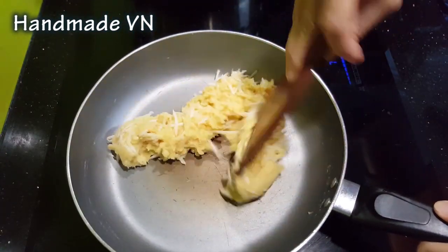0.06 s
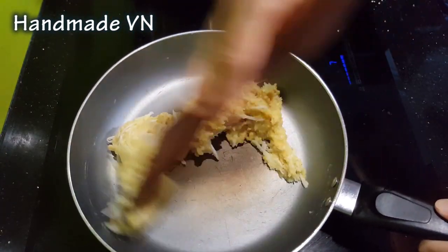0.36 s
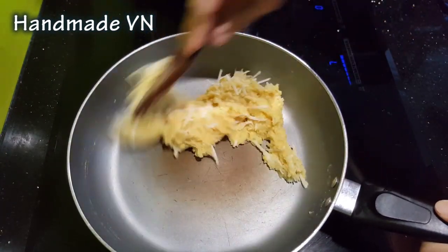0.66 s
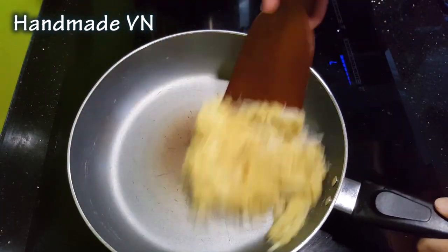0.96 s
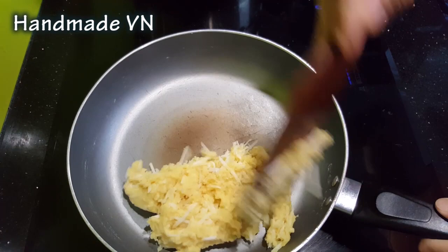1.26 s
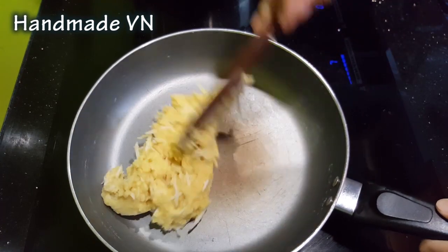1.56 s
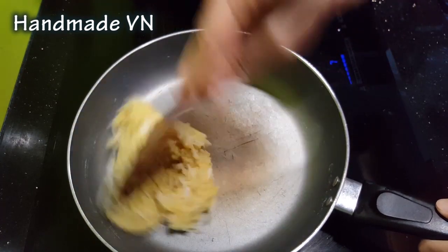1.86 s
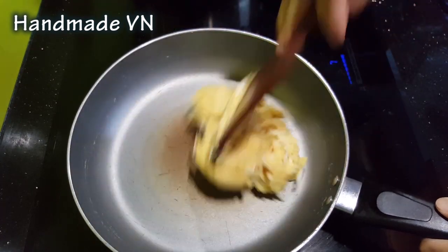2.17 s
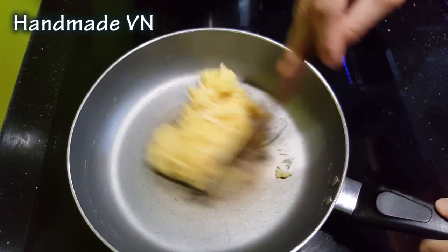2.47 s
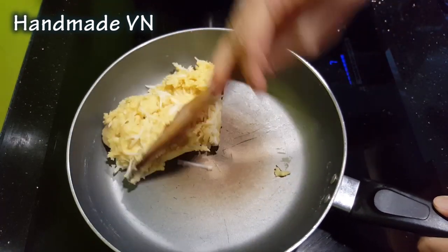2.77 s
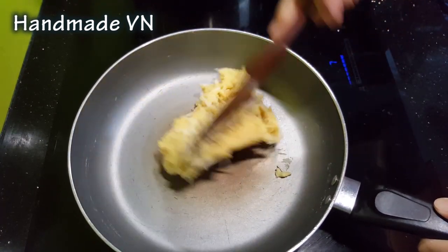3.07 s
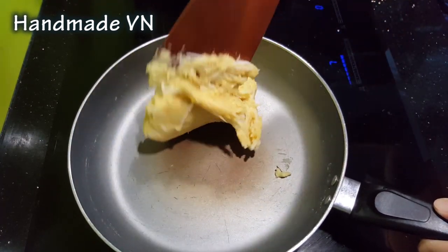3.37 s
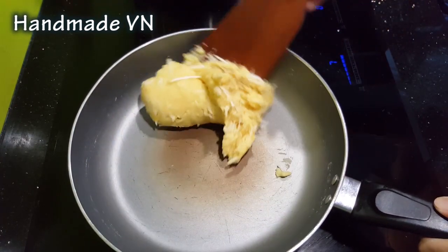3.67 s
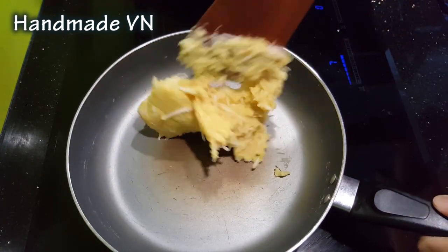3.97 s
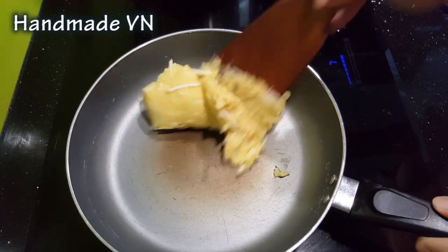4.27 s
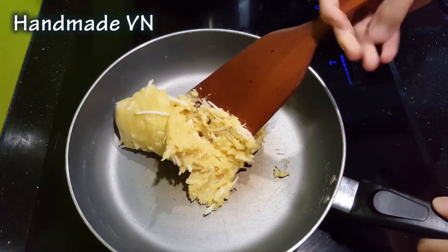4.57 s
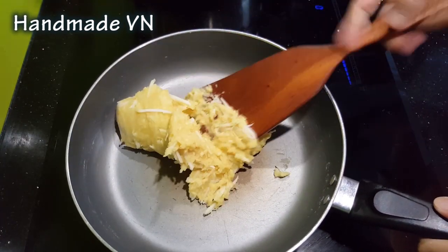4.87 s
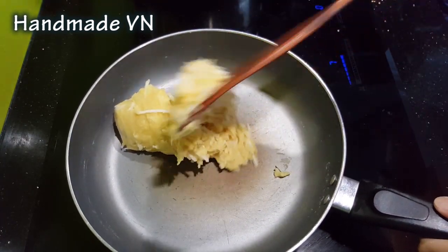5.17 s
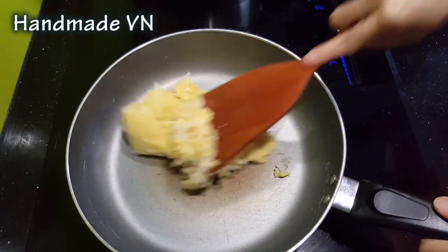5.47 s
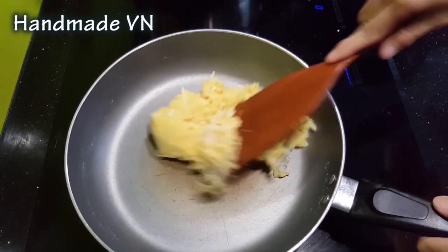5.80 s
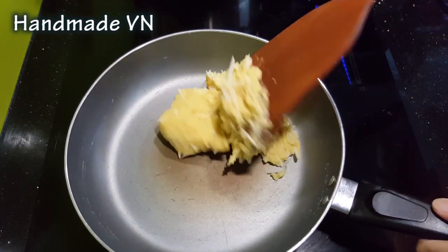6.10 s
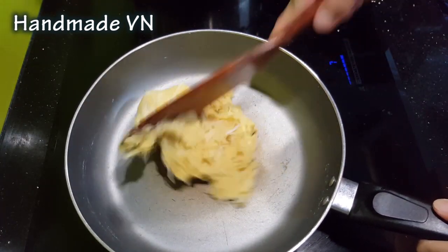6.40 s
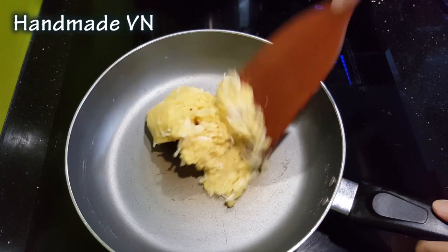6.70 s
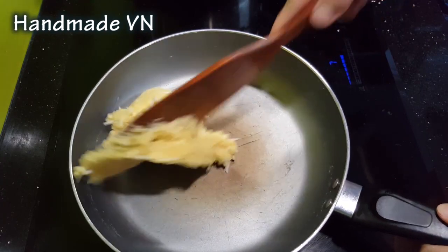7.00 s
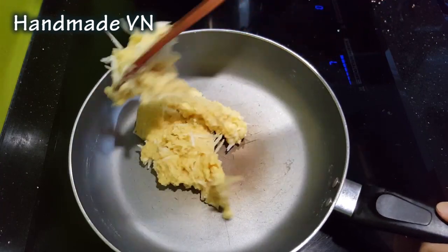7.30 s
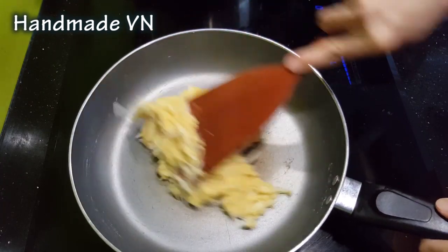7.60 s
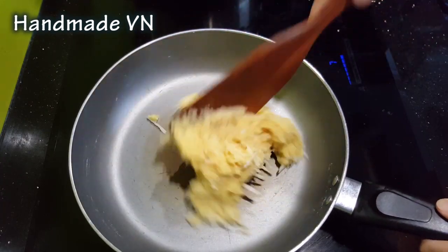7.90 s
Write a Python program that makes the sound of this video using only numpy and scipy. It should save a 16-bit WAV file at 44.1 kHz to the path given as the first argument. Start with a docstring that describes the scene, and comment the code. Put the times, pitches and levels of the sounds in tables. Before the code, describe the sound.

Over a low electric hum and soft fan, a wooden spatula scrapes thick food around a frying pan, with dull clacks and thumps.

```python
"""A wooden spatula folds a thick, sticky mixture in a nonstick pan, in a small kitchen.
From the start the induction hob hums over its cooling fan, while the blade rubs across the coating,
knocks on the metal and snaps sticky strands. Just after 3 s the pan thumps hardest on the glass top.
Softer strokes follow, the bare edge squeaking, and a little after 5 s lumps flop over.
A sharp clack at 7 s leads into the last strokes."""
import sys
import numpy as np
from scipy import signal
from scipy.fft import rfft, irfft, next_fast_len
from scipy.io import wavfile
from scipy.ndimage import uniform_filter1d

SR = 44100
rng = np.random.default_rng(int(sys.argv[2]) if len(sys.argv) > 2 else 0)


def generate_wav(sig):
    """Save sig (samples, or channels by samples) to the path in sys.argv[1] as 16-bit PCM at SR."""
    pcm = np.round(np.clip(np.atleast_2d(sig).T, -1, 1) * 32767).astype(np.int16)
    wavfile.write(sys.argv[1], SR, pcm)


N = 355005
HUM_HZ = 100.27  # twice the mains frequency
PUSH_S, EASE_S = 0.12, 0.064  # the blade gathers speed and slows down over these times


def rubbing(slips_per_s=1100, judder_db=1.3, ring_db=-8, creep_db=-69.5, uneven_db=0.8):
    """Countless tiny slips of wood and mixture on the coating; each stroke brings out its own note."""
    # Blade strokes. Each row: start and length in seconds, level in dB, note of blade and pan in Hz.
    strokes = [(0.03, 0.18, -54, 2370), (0.361, 0.13, -51.5, 1300), (0.584, 0.23, -54, 2220),
               (0.8, 0.19, -60, 2730), (1.05, 0.38, -67.5, 1400), (1.331, 0.47, -56, 3020),
               (2.133, 0.15, -58, 2400), (2.433, 0.18, -64, 1250), (2.657, 0.24, -55.5, 1200),
               (3.155, 0.17, -55.5, 2340), (3.55, 0.24, -60.5, 1104), (4.151, 0.31, -77, 2800),
               (4.441, 0.18, -58.5, 3000), (5.005, 0.17, -57, 1990), (5.307, .55, -70.5, 2750),
               (5.454, .35, -64.5, 700), (6.071, 0.29, -62.5, 2980), (6.173, 0.36, -62, 1400),
               (6.486, 0.16, -55.5, 2100), (6.697, 0.29, -69, 2600), (7.07, 0.25, -61.5, 1100),
               (7.504, 0.18, -52, 2420), (7.779, 0.15, -64.5, 2410)]
    # Tone of the rubbing. Each row: frequency in Hz, level in dB.
    rub_tone = [(150, -35), (350, -6.5), (750, 0), (1400, 7), (1900, 1.5), (2500, 2.5), (3300, 0),
                (5000, -4.5), (7000, -15), (9500, -30.5), (12500, -8.5), (14000, -37.5)]
    slips = (rng.random(N) < slips_per_s / SR) * amp(3 * np.minimum(rng.exponential(1, N), 5))
    drive = unit(unit(slips * noise(N)) + 0.9 * noise(N))  # grain plus smooth sliding
    drive = drive * amp(judder_db * drift(70)) * (1 + 0.051 * coil_wave(N))
    rub = unit(colour(pair(drive), rub_tone))
    rub += amp(ring_db) * unit(signal.oaconvolve(drive[:1], pan_ring(), axes=1)[:, :N])
    out = amp(creep_db) * touching() * rub  # between strokes the blade still creeps along
    for s, length, db, hz in strokes:
        strength = stroke_swell(length)
        start = rng.integers(N - len(strength))  # every stroke crosses other grit
        note = voiced([(hz, 0)], hz, lift_db=4, octaves=0.34)
        stroke = colour(rub[:, start:start + len(strength)], note)
        add(out, s - PUSH_S / 2, amp(db) * unit(stroke) * strength)
    return amp(uneven_db * drift(25)) * out  # the hand presses a little unevenly


def stroke_swell(length, arch_db=1):
    """Friction over one stroke: it swells, peaks halfway where the blade is fastest, and eases off."""
    t = np.arange(-PUSH_S / 2, length + EASE_S / 2, 1 / SR)
    moving = np.clip(t / PUSH_S + 0.5, 0, 1) * np.clip((length - t) / EASE_S + 0.5, 0, 1)
    arch = np.sin(np.pi * np.clip(t / length, 0, 1))
    return moving * amp(arch_db * (arch - 2.5))


def touching():
    """A soft gate: one while the blade is in the mixture, zero while it is lifted clear."""
    # Lifts of the blade. Each row: start in seconds, length in seconds.
    lifts = [(1.81, 0.19), (2.955, 0.055), (3.33, 0.05), (4.71, 0.18), (7.317, 0.058)]
    t = np.arange(N) / SR
    lifted = sum((t > s) & (t < s + length) for s, length in lifts)
    return 1 - uniform_filter1d(lifted.astype(float), size=1500)


def rasps(chatter=0.15, grit_db=1.0):
    """The bare edge chatters as it drags over the humming pan, and excites one squeaky resonance."""
    # Drags. Each row: start and length in seconds, level in dB, squeak in Hz, squeak boost in dB.
    drags = [(0.421, 0.084, -46, 1294, 11.5), (0.601, 0.1, -58, 1770, 3), (3.13, 0.16, -53, 1500, 3),
             (3.57, 0.34, -64.5, 1934, 26), (4.399, 0.59, -72, 1980, 22), (4.995, 0.24, -62, 1100, 2),
             (6.172, 0.23, -67, 1480, 11), (7.008, 0.036, -38.5, 2460, 7), (7.022, 0.071, -43.5, 1300, 9.5),
             (7.551, 0.21, -52, 1340, 5)]
    # Tone of the dragging edge. Each row: frequency in Hz, level in dB.
    rasp_tone = [(120, -16), (280, 6), (600, 0), (900, 3), (1350, -2.5), (1800, -0.5), (2500, -4.5),
                 (4000, -9.5), (6000, -19.5), (9000, -31), (13000, -31)]
    out = np.zeros((2, N))
    for s, length, db, hz, lift_db in drags:
        t = np.arange(int(length * SR)) / SR
        grit = noise(SR) * amp(grit_db * drift(520)[:SR])
        drive = grit[:, :len(t)] * (1 + chatter * coil_wave(len(t)))
        scrape = unit(colour(pair(drive), voiced(rasp_tone, hz, lift_db, octaves=0.17)))
        add(out, s, amp(db) * scrape * np.sin(np.pi * t / length))
    return out


def knocks(crack_db=5, crack_s=0.00028, rise_s=0.00024, flat_delay_s=0.0035, flat_db=-5):
    """Wood hits metal, corner first, then the flat edge: a crack, a short clatter, a damped ring."""
    # Corner hits. Each row: time in seconds, body level in dB, treble level in dB,
    # contact t60 in seconds, hollow note in Hz, pan ring against the clatter in dB.
    corners = [(0.2539, -30.5, -57, 0.015, 1470, -13), (.256, -32.5, -58, 0.021, 720, -17),
               (0.263, -60, -45, .025, 1360, -21), (.281, -58, -51, .025, 620, -18),
               (0.291, -52, -55, .03, 580, -10), (.311, -58, -69, 0.033, 587, -15),
               (.327, -61, -68, 0.028, 680, -12), (0.558, -52, -63, 0.12, 1100, -3),
               (.592, -58, -52.5, 0.044, 1490, -9), (2.01, -46.5, -50, 0.055, 860, -6),
               (2.012, -45, -49.5, 0.031, 1630, -8), (2.085, -62, -49, .025, 1910, -1),
               (2.109, -33.5, -53, 0.027, 488, -22), (2.116, -43, -66, 0.025, 1080, -8),
               (3.083, -35, -35, .028, 2120, -6), (3.12, -24, -38, 0.042, 1330, -15.5),
               (3.493, -52.5, -52.5, 0.042, 1950, -2), (5.189, -61, -53, 0.026, 1171, -8),
               (6.131, -54, -65, 0.017, 1090, -3), (6.533, -45.5, -53, 0.086, 766, -8),
               (7.0068, -29.5, -42.5, 0.044, 930, 6), (7.011, -40.5, -53, 0.038, 286, -18),
               (7.012, -34, -48, 0.034, 1100, 3), (7.045, -46, -40, 0.025, 1390, -6),
               (7.0595, -47, -43, .03, 2000, -12), (7.619, -51, -48, 0.11, 1360, -3)]
    # Tone of the clatter. Each row: frequency in Hz, level in dB.
    clack_tone = [(40, -65), (100, -21), (270, 6), (340, 8.5), (420, 3.5), (500, -1.5), (760, 1),
                  (1050, -7.5), (1400, -8.5), (1900, -9.5), (2600, -8), (4000, -17), (6000, -20),
                  (8000, -44), (13000, -28)]
    flats = [(s + flat_delay_s, db + flat_db, top_db + flat_db, *rest)
             for s, db, top_db, *rest in corners]
    out, t = np.zeros((2, N)), np.arange(SR // 5) / SR
    for s, db, top_db, t60, hz, ring_db in corners + flats:
        contact = amp(-60 * t / t60) + amp(crack_db) * np.exp(-t / crack_s)
        contact *= 1 - np.exp(-t / rise_s)
        clack = crest(colour(pair(noise(len(t))) * contact, clack_tone))
        clack += amp(ring_db) * crest(pan_ring())
        # the place and softness of the contact bring out one note and damp what lies far from it
        band = [(hz / 4, -7), (hz / 2, 0), (hz * 2, 0), (hz * 4, -8)]
        lift_db = 8 + 9 * np.clip(np.log2(800 / hz), 0, 1)  # cushioned blows sound the most hollow
        hit = crest(colour(clack, voiced(band, hz, lift_db, octaves=0.36)))
        top = treble(hit, 2140)
        add(out, s, amp(db) * (hit - top) + amp(top_db) * crest(top))
    return out


def pan_ring(spread_db=6.5):
    """The loaded pan rings briefly; the balance of its modes changes with the place that is touched."""
    # Pan modes. Each row: frequency in Hz, level in dB, t60 in seconds.
    pan_modes = [(384, -9, 0.12), (553, -7.5, 0.25), (780, 7.5, 0.063), (820, -3.5, 0.032),
                 (955, -3.5, 0.087), (1120, 0.5, 0.074), (1358, 0, .042), (1355, -0.5, 0.032),
                 (1640, -28, 0.068), (1960, -17, 0.048), (2080, -24, 0.042), (2580, -6, 0.022),
                 (3360, -9, 0.077), (3610, -21, 0.052)]
    t = np.arange(SR // 5) / SR
    hz, db, t60 = np.transpose(pan_modes)[:, :, None]
    shape = (2, len(pan_modes), 1)
    decay = amp(db + spread_db * rng.standard_normal(shape) - 60 * t / t60)
    modes = decay * np.sin(2 * np.pi * (hz * t + rng.random(shape)))
    return pair(modes.sum(1))


def thumps(rise_s=0.01, low_cut_hz=63, lag_s=0.000095):
    """The pan rocks and drops back on the glass; harder landings favour the higher modes."""
    # Landings. Each row: time in seconds, level in dB, hardness in dB per octave, ring time factor.
    landings = [(.035, -42, 12, 1), (.254, -27, 1, 0.72), (0.279, -35.5, 10.5, 1.1), (0.313, -40, 17, 0.85),
                (.41, -38, -2, 0.88), (0.554, -41.5, 2, .9), (.588, -32.5, -9, 0.62),
                (0.622, -38.5, 9.5, 0.67), (1.237, -38, -7, 1.2), (2.007, -39, -7, 1.2),
                (2.108, -21.5, -4.5, 0.65), (2.146, -37, -2, 0.5), (3.084, -33, 3.5, 0.83),
                (3.108, -11, 4.5, 0.59), (3.1244, -22.5, 22.5, 0.75), (3.152, -28, 5, 0.46),
                (3.203, -29.5, -25, .6), (3.238, -34, -15.5, 0.61), (3.225, -38.5, 7, 3.7),
                (6.535, -34.5, -5.5, 1.1), (7.006, -25, 2, 0.81), (7.586, -28, -14, 0.99),
                (7.622, -44, 7, 0.87)]
    # Low modes of pan and hob top. Each row: frequency in Hz, level in dB, t60 in seconds.
    hob_modes = [(87.7, 5, 0.13), (111.5, 13, 0.11), (136.5, 0, 0.2), (163, 8.5, 0.064), (221.8, 4, 0.16),
                 (371, -19, 0.11), (463, -3.5, 0.017)]
    out, t = np.zeros((2, N)), np.arange(SR // 2) / SR
    hz, db, t60 = np.transpose(hob_modes)[:, :, None]
    arrival = np.array([t, t - lag_s])[:, None]  # the left microphone is nearer
    attack = 1 - np.exp(-t / rise_s)
    for s, level_db, hardness, ring in landings:
        decay = amp(db + hardness * np.log2(hz / hz[0]) - 60 * t / (t60 * ring))
        modes = decay * np.sin(2 * np.pi * hz * arrival)
        add(out, s, amp(level_db) * crest(modes.sum(1) * attack))
    return signal.sosfilt(signal.butter(6, low_cut_hz, "high", fs=SR, output="sos"), out)


def snaps(trim_db=-1, decay_s=0.0079):
    """Sticky strands tear off the coating, each with a tiny pitched crackle."""
    # The loudest strands. Each row: time in seconds, level before the trim in dB, pitch in Hz.
    strands = [(0.1016, -58, 1880), (1.3707, -57, 2410), (1.492, -55, 3200), (2.298, -61, 4200),
               (2.911, -54.5, 1860), (4.2512, -57, 2040), (5.091, -56.5, 2590), (4.3037, -58, 2830),
               (4.605, -52.5, 3250), (4.676, -54.5, 3200), (4.9922, -58, 4400), (6.103, -56, 4450),
               (6.535, -44, 3900), (6.614, -60, 2070),  (7.222, -56.5, 2000)]
    # Tone of a snap. Each row: frequency in Hz, level in dB.
    snap_tone = [(400, -39.5), (1200, -13), (2400, 2.5), (3300, 2.5), (4500, -1), (7000, -17.5),
                 (9500, -12), (13000, -19)]
    out, t = np.zeros((2, N)), np.arange(SR // 8) / SR
    for s, db, hz in strands:
        burst = noise(len(t)) * np.exp(-t / decay_s)
        snap = colour(burst, voiced(snap_tone, hz, lift_db=11, octaves=0.11))
        add(out, s, amp(db + trim_db) * crest(snap))
    return out


def flops(swell_s=0.009):
    """Lumps fold over and land with a soft, hollow pop: a low note and a puff of air."""
    # Lumps. Each row: time in seconds, level in dB, pitch in Hz.
    lumps = [(5.225, -48, 367), (5.256, -52, 460), (5.327, -52.5, 345), (5.368, -54.5, 328)]
    # Tone of the puff. Each row: frequency in Hz, level in dB.
    puff_tone = [(200, -9.5), (380, 13), (520, -1), (850, -4), (1600, -31), (5000, -56)]
    out, t = np.zeros((2, N)), np.arange(SR // 8) / SR
    for s, db, hz in lumps:
        puff = unit(colour(pair(noise(len(t))), puff_tone))
        pop = (np.sin(2 * np.pi * hz * t) + puff) * t * np.exp(-t / swell_s)
        add(out, s - swell_s / 2, amp(db) * crest(pop))
    return out


def fizz(level_db=-75.5):
    """Wet strands sliding over each other give a fine, high hiss."""
    # Tone of the hiss. Each row: frequency in Hz, level in dB.
    fizz_tone = [(3000, -26), (6000, -16), (9500, -11), (12000, -0.5), (13400, 1.5), (15000, -16)]
    return amp(level_db) * touching() * unit(colour(noise(N), fizz_tone))


def hum(wobble_db=1.27, overtone_waver=0.3, whine_waver=0.18):
    """The coil shakes the pan, louder or softer as the pan shifts over it; thin whines ride above."""
    # Level ride of the fundamental. Each row: time in seconds, level in dB.
    ride = [(0.01, -48), (0.04, -50), (0.09, -36), (0.15, -35), (0.33, -38), (1.35, -44), (1.8, -33.5),
            (2.0, -36), (2.3, -36), (2.75, -37.5), (3.39, -37), (3.49, -43), (3.76, -36), (4.03, -36.5),
            (4.58, -40.5), (4.62, -35), (5.23, -38), (6.41, -36.5), (6.47, -47.5), (6.55, -34),
            (6.62, -42.5), (6.72, -38), (7.01, -40), (7.24, -35), (7.57, -40), (7.7, -36.5), (8.04, -36.5)]
    # Overtones. Each row: multiple of the fundamental, rms level in dB.
    overtones = [(2, -64.5), (3, -76), (4, -78), (5, -81)]
    # Whines of the hob. Each row: frequency in Hz, rms level in dB, start and end in seconds.
    whines = [(1960, -88, 3.5, 5.3), (2047, -84, 0, 5.3), (2105, -84, 3.5, 7.6), (2304, -86, 4, 7.6),
              (2708, -83, 4, 7.6), (3811, -80.5, 3.7, 7.6), (4011, -88, 3.7, 7.6)]
    t = np.arange(N) / SR
    ride_db = np.interp(t, *np.transpose(ride))
    drone = amp(ride_db + wobble_db * drift(11)) * coil_wave(N)
    for multiple, db in overtones:
        drone += amp(db) * (1 + overtone_waver * drift(5.8)) * np.sin(2 * np.pi * multiple * HUM_HZ * t)
    out = np.array([drone, drone])
    for hz, db, on_s, off_s in whines:
        fade = np.clip(2 * np.minimum(t - on_s, off_s - t) + 0.5, 0, 1)
        level = amp(db) * fade * (1 + whine_waver * drift(11))
        phase = rng.random((2, 1)) + 1.34 * drift(17)
        out += level * np.sin(2 * np.pi * hz * t + phase)
    return np.sqrt(2) * out


def coil_wave(samples):
    """The vibration that the coil gives the pan: a sine at the hum's pitch."""
    return np.sin(2 * np.pi * HUM_HZ * np.arange(samples) / SR)


def fan(air_db=-61.5, rumble_db=-57.5, buzz=0.11):
    """The cooling fan lays down a bed of air and rumble; its top end pulses with the hum."""
    # Tone of fan and electronics. Each row: frequency in Hz, level in dB.
    air_tone = [(150, -17.5), (260, -16.5), (330, -6), (450, -6.5), (600, -3), (1080, -7), (1280, -14.5),
                (1950, -8), (2600, -9), (3900, -13), (5000, -17), (8000, -23.5), (10200, -27), (13400, -16)]
    # Tone of the rumble. Each row: frequency in Hz, level in dB.
    rumble_tone = [(15, 17), (33, 4), (48, 1.5), (70, 14.5), (130, 6), (220, 6.5), (300, -4.5), (500, -31)]
    air = unit(colour(pair(noise(N)), air_tone))
    air += buzz * treble(air, 3500) * coil_wave(N)
    rumble = unit(colour(pair(noise(N)), rumble_tone))
    return amp(air_db) * air + amp(rumble_db) * rumble


def kitchen(x, predelay_s=0.0037):
    """Dense reflections from worktop and walls, each band dying at its own speed."""
    # Room decay. Each row: frequency in Hz, t60 in seconds.
    decay_times = [(80, 1), (230, 0.37), (400, 0.43), (1000, 0.29), (4000, 0.32), (12000, 0.091)]
    hz, t, bands = signal.stft(noise(SR // 2), SR, nperseg=256)
    bands *= amp(-60 * t / read(decay_times, hz)[:, None])
    tail = pair(signal.istft(bands, SR, nperseg=256)[1])
    tail *= np.clip(np.arange(tail.shape[1]) / SR / predelay_s - 1, 0, 1)
    return signal.oaconvolve(x, tail / np.linalg.norm(tail[0]), axes=1)[:, :N]


def pair(x):
    """Two unrelated signals become alike in the bass, as at two close microphones."""
    # Stereo image. Each row: frequency in Hz, left-right correlation.
    likeness = [(100, 1), (250, 0.91), (500, 0.57), (1000, 0.42), (2500, 0.054), (5000, -0.15),
                (12000, 0.0061)]
    size = next_fast_len(x.shape[1] + 512)
    a, b = rfft(x, size)
    same = read(likeness, np.fft.rfftfreq(size, 1 / SR))
    mid, side = a * np.sqrt((1 + same) / 2), b * np.sqrt((1 - same) / 2)
    return irfft(np.array([mid + side, mid - side]), size)[:, :x.shape[1]]


def colour(x, points, size=4096):
    """Minimum-phase EQ through points of (Hz, dB)."""
    log_gain = np.log(amp(read(points, abs(np.fft.fftfreq(size, 1 / SR)))))
    response = np.exp(np.conj(signal.hilbert(log_gain)))
    taps = np.fft.ifft(response).real[:size // 2]
    return signal.oaconvolve(x, taps[None], axes=1)[:, :x.shape[1]]


def voiced(points, hz, lift_db, octaves):
    """An EQ curve with a bell-shaped resonance added at hz."""
    grid = np.geomspace(50, 16000, num=300)
    bell = np.exp(-(np.log2(grid / hz) / octaves) ** 2)
    return np.transpose([grid, read(points, grid) + lift_db * bell])


def treble(x, hz):
    """The part of a sound above hz."""
    return signal.sosfiltfilt(signal.butter(2, hz, "high", fs=SR, output="sos"), x)


def read(points, hz):
    """Reads a table on a log-frequency axis."""
    f, value = np.transpose(points)
    return np.interp(np.log(hz + 1), np.log(f + 1), value)


def noise(samples):
    """Two unrelated channels of white noise."""
    return rng.standard_normal((2, samples))


def drift(rate):
    """A random wander of rms 1, with `rate` new values a second."""
    knots = rng.standard_normal(4000)
    return unit(np.interp(np.arange(N) / SR * rate, np.arange(len(knots)), knots))


def amp(db):
    """Decibels to gain."""
    return 10 ** (np.asarray(db) / 20)


def unit(x):
    """Scales to rms 1."""
    return x / np.sqrt(np.mean(x ** 2) + 1e-20)


def crest(x):
    """Scales a hit so that its loudest 4 ms have rms 1."""
    power = uniform_filter1d(np.atleast_2d(x ** 2).mean(0), size=176)
    return x / np.sqrt(power.max() + 1e-20)


def add(mix, s, sound):
    """Mixes a sound in at s seconds."""
    part = mix[..., max(round(s * SR), 0):][..., :sound.shape[-1]]
    part += sound[..., :part.shape[-1]]


def scene(stir_send_db=-10, thump_send_db=-20):
    """Spatula, pan and mixture in the room, over the running hob."""
    stirring = rubbing() + rasps() + knocks() + snaps() + flops()
    rocking = thumps()
    room = kitchen(amp(stir_send_db) * stirring + amp(thump_send_db) * rocking)
    return stirring + rocking + room + fizz() + hum() + fan()


def record(dry, cutoff_hz=13650):
    """Each microphone has its own colour; a steep low-pass takes off the very top."""
    # Balance of the microphone pair. Each row: frequency in Hz, left minus right in dB.
    balance = [(100, 0.8), (200, 2), (350, -3.5), (700, 1.5), (1400, 2), (2400, 0.5), (3200, -4.5),
               (4000, -1), (5000, -3), (7000, 0.5), (11000, -2), (13200, 3)]
    size = next_fast_len(N + 2048)
    lean_db = read(balance, np.fft.rfftfreq(size, 1 / SR))
    heard = irfft(rfft(dry, size) * amp(np.array([lean_db, -lean_db]) / 2), size)[:, :N]
    low_pass = signal.firwin(511, cutoff_hz, window=("kaiser", 9), fs=SR)
    return signal.oaconvolve(heard, low_pass[None], "same")


dry = scene()
out = record(dry)
generate_wav(out)
```